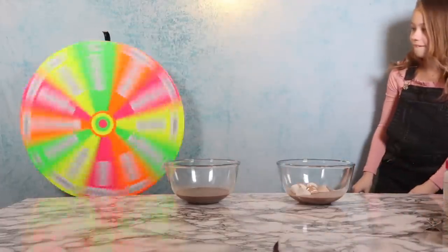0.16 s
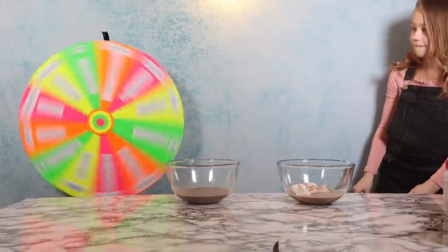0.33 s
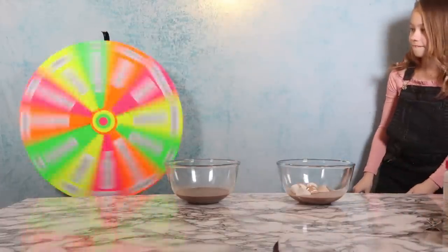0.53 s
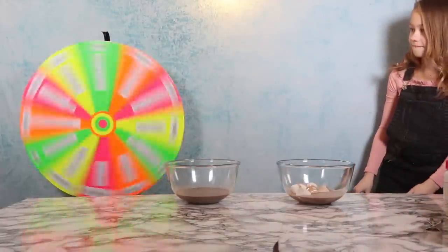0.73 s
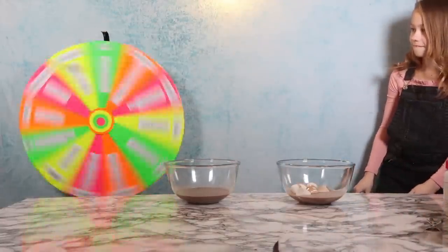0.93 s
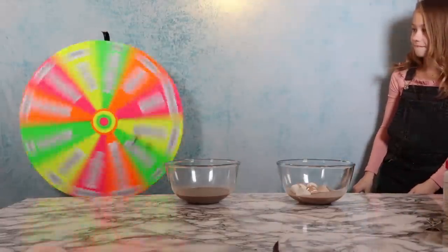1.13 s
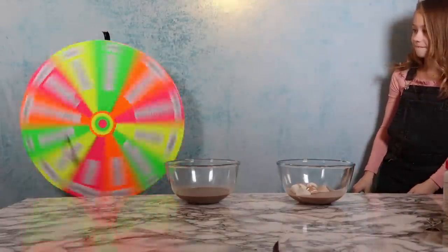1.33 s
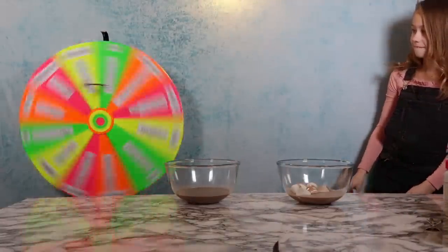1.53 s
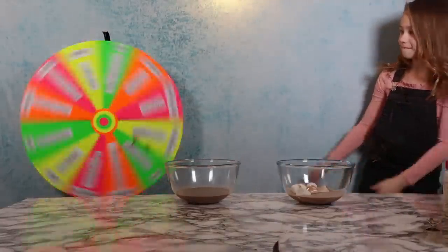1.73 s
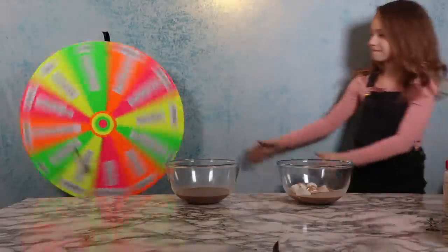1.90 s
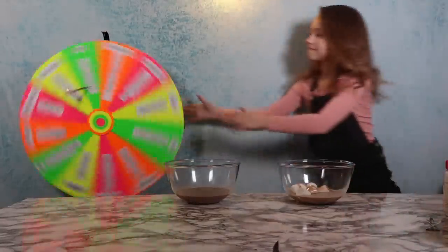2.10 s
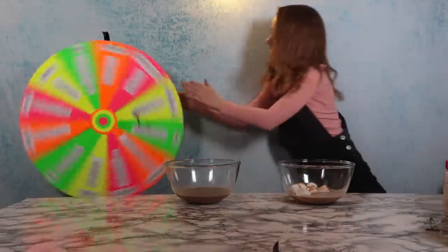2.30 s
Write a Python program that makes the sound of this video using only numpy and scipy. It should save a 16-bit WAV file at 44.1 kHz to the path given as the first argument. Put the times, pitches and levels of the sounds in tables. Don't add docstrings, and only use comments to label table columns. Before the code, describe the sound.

A dart smacks hard into a spinning wooden wheel, with hollow knocks before and after

```python
import sys
import numpy as np
from scipy import signal
from scipy.fft import rfft, irfft
from scipy.io import wavfile
from scipy.ndimage import uniform_filter1d

SR = 44100
rng = np.random.default_rng(int(sys.argv[2]) if len(sys.argv) > 2 else 0)


def gain_from_db(level_db):
    decades = np.asarray(level_db, float) / 20
    return 10 ** decades


def transcribe(u):
    v = np.clip(np.atleast_2d(u).T, -1, 1)
    q = np.round(v * 32767).astype(np.int16)
    wavfile.write(sys.argv[1], SR, q)


N = 108177
CLOCK_S = np.arange(N) / SR
T = np.arange(32768) / SR
SCUFF_S, SCUFF_LENGTH_S = 2.409, .06

# f/Hz, density/dB
HUM_COLOUR = [(25, -8), (54, -3.5), (133, -8), (403, -13), (916, -24), (3930, -33.5), (12500, -51.5),
              (15000, -65)]
# f/Hz, level/dB
HUM_SIDE = [(60, -27), (110, -25), (200, -8), (380, -8), (700, -8.5), (1290, -6.5), (2380, -6), (4400, 0),
            (8120, 2), (15000, 8.5)]
# t/s, level/dB
RUMBLE = [(0, 1.5), (.17, 0), (.27, -4), (.4, 1), (.6, -0.5), (.72, 2), (.85, -7), (1.05, -4), (1.27, -2.5),
          (1.36, -7), (1.56, -8), (1.64, -3), (1.75, -5), (1.9, -0.5), (2.0, -4), (2.2, 2), (2.45, 2)]
FIRM_STEPS_S = [.237, .270, .304, .387, .404, .437, .470, .532, .571, .654, .737, .820, .837, .871, .906,
                .922, .966, 1.004, 1.089, 1.548, 1.567, 1.615, 1.682, 1.732, 1.922, 1.949, 2.015, 2.082,
                2.369]
# t/s, peak/dB, f/Hz, t60/s
BOOMS = [(.078, -31, 89.4, 0.312), (0.099, -34.5, 50.7, 0.26), (0.323, -29, 73.1, 0.188),
         (0.454, -32, 94.6, 0.13), (0.676, -30, 68, 0.225), (0.921, -37.5, 55.8, 0.374),
         (1.61, -37, 120.2, 0.17), (1.823, -33.5, 85.3, 0.182), (2.059, -32.5, 99.4, 0.175),
         (2.08, -34, 47.1, 0.23), (2.186, -27, 24.2, 0.353), (2.425, -30, 100, 0.25)]
# start/s, length/s, level/dB, centre/Hz, relative width/1
RUSTLES = [(.859, .059, -47, 1750, .3), (.88, .12, -54, 2400, 1.2), (.915, .05, -47, 850, .9),
           (1.1, .024, -31, 2800, 1.3), (1.17, .13, -39, 500, 1.2), (1.578, .074, -48, 1100, 1.4),
           (1.615, .03, -43, 220, 1.2), (1.99, .06, -51, 2200, 1.2), (2.03, .07, -47.5, 1200, 1.6),
           (2.04, .023, -44, 400, 1.6), (2.11, .12, -49.5, 2400, 1.3), (2.187, .1, -39.5, 680, 2),
           (2.17, .19, -55, 4300, .9), (2.235, .025, -43, 1100, 1.5), (2.251, .039, -39, 283, 1.2),
           (2.255, .04, -49, 1300, 1.6), (SCUFF_S, SCUFF_LENGTH_S, -32.5, 1000, 1.4),
           (.452, .06, -41, 900, 1.8)]
# f/Hz, t60/s
ROOM_T60 = [(100, 0.913), (300, 0.19), (1000, 0.2994), (3000, 0.31), (7000, 0.37), (12000, 0.058)]
# f/Hz, level/dB
HIT_SIDE = [(60, -40.5), (200, -24.5), (500, -19), (1290, -18.5), (2380, -15.5), (4400, -9.5), (8120, -2),
            (15000, 3)]
# t/s, peak/dB, body/Hz, dull above/Hz, rattle/dB
KNOCKS = [
    (0.075, -17, 1445, 2950, -25),
    (0.3144, -23.5, 1100, 3330, -43.5),
    (0.4515, -24, 350, 2400, -21),
    (0.6605, -13.5, 330.9, 2343, -25.5),
    (0.865, -40, 1750, 2334, -45),
    (1.8203, -15.5, 323, 2920, -27.5),
    (2.4310, -16.5, 854, 2400, -30.5),
]
# f/Hz, width/Hz, level/dB
KNOCK_MODES = [
    [(279.5, 22.7, -5.5), (399.6, 25.2, 1.5), (604.5, 33.5, 1.5), (876.6, 135, -2.5), (1218.7, 25, -2.5),
     (1825, 36.6, -3.5), (2406, 68, -13)],
    [(760.3, 25, -5), (951, 28.5, -6), (1176, 59, -3), (1808, 67, -9.5), (2160, 22, -6.5),
     (2400, 46, -12.5), (3140, 46, -20.5)],
    [(264.3, 183, -0.5), (624, 39, -2), (897.6, 32, -5.5), (1210, 33, -7.5), (1940, 120, -15.5)],
    [(241.2, 34.8, -2.5), (613.6, 60.5, -4.5), (761.5, 22.6, -5), (899.6, 26, -2.5), (1068, 27.4, 1),
     (1189, 42, -5.5), (1812, 63, -11), (1976, 19.4, -15.5), (2400, 27, -16)],
    [(1588, 48, -0.5), (1876, 27, -1.5)],
    [(237.8, 17, -4.5), (403.7, 30, -2), (535, 54, -2.5), (904.4, 28.2, 1), (1058.6, 21, -3.5),
     (1273, 86, -10.5), (1652.6, 43, -12.5), (1976, 18.4, -14.5)],
    [(389, 108, 1), (763, 546, -1.5), (1672.7, 60, -7.5), (1957, 127, -9), (2460, 67, -18)],
]
# f/Hz, density/dB
KNOCK_COLOUR = [(100, -20.5), (220, 0.5), (300, 3), (1000, -2.5), (1800, -8), (3500, -13.5), (6000, -23)]
# f/Hz, density/dB
RATTLE_COLOUR = [(2500, -27), (4500, -7), (6500, -5), (9500, -6.5), (11000, -14.5), (14000, -28.5)]
# f/Hz, width/Hz, level/dB
BARK_MODES = [(925.6, 160, -8.5), (1134.6, 160, 4), (1534.5, 140, -12), (2003.6, 170, -6),
              (2656.4, 120, -7.5), (3950, 300, -8), (5240, 230, -16.5), (8644, 300, -26.5)]
# f/Hz, level/dB, t60/s
RING_MODES = [(287, -8, .4), (915, -10, .18), (1225, -4, .18), (1505, -7, .28), (1651, -6, .28),
              (1750, -8, .25), (2001, -4, .3), (2105, -6, .15), (2273, -7, .22), (2370, -9.5, .25),
              (2675.4, -8, .22), (2851, -13, 0.18), (3114.4, -16, .16), (650, -14, .2)]
# f/Hz, level/dB, t60/s
BEATING_PAIR = [(1033, -1, .24), (1075, -2, .24)]
# f/Hz, density/dB
DART_COLOUR = [(150, -25.5), (290, -9), (760, -18.5), (1200, -0.5), (2700, -6), (3500, -28), (6500, -28.5),
               (10000, -50)]
# f/Hz, density/dB
CRACK_COLOUR = [(1500, -19.5), (3400, -0.5), (4000, 15), (9000, -1), (15000, -14)]

HUM_DB, WHINE_HZ, WHINE_DB = -46, 13006, -85.5
STEP_HZ, STEP_FROM_S, STEP_TO_S = 59.94, .237, 2.1
STEP_DB, FIRM_DB, STEP_MID_DB = -56.5, -45, -12
STEP_RING_HZ, STEP_T60_S, STEP_RISE_S = 4220, 0.011, 0.000545
BOOM_WAVER_DB, BOOM_RISE_S = 2, 0.0086
SWISH_GRAIN_DB, SWISH_Q = 1, 0.56
ECHOES_PER_S, FIRST_ECHO_S, FILL_S = 2300, .002, .006
SMALL_BELOW_HZ, WIDEST_HZ = 210, 60
KNOCK_GAIN_DB, KNOCK_WET_DB, CLICK_DB, KNOCK_Q = 16.5, 1, -12, 2.2
PLANK_RING, THUD_DB, THUD_T60_S = 3.8, -3, .04
RATTLE_LATE_S, BARK_RISE_S = 0.0048, 0.00077
DART_S, DART_DB, DART_WET_DB = 1.1098, 3.5, 12.5
CRACK_DB, CRACK_S, RING_DB, RING_MAX_S = -6, .0008, -18, .3
DUCK_DB, DUCK_S, HOLD_S, BACK_S = -7, 0.1, 0.55, 0.33
TOP_HZ = 14200


def read(table, hz):
    table = np.array(table, float)
    log_hz = np.log(np.maximum(table[:, 0], 1))
    return np.interp(np.log(np.maximum(hz, 1)), log_hz, table[:, 1])


def colour(x, table):
    size = 4096
    hz = np.arange(size // 2 + 1) * SR / size
    cepstrum = irfft(read(table, hz) * np.log(10) / 20)
    cepstrum[1:size // 2] *= 2
    cepstrum[size // 2 + 1:] = 0
    return signal.fftconvolve(x, irfft(np.exp(rfft(cepstrum))))[:len(x)]


def unit(x, db=0.):
    return x * gain_from_db(db) / np.sqrt(np.sum(x ** 2))


def ring(modes, t):
    return sum(gain_from_db(db) * np.sin(2 * np.pi * hz * t) * gain_from_db(-60 * t / max(t60, .002))
               for hz, db, t60 in modes)


def band(x, hz, q):
    edges = [hz / (1 + .5 / q), min(hz * (1 + .5 / q), .45 * SR)]
    return signal.sosfilt(signal.butter(1, edges, "band", fs=SR, output="sos"), x)


def walk(rate_hz):
    k = int(SR / rate_hz)
    steps = np.repeat(rng.standard_normal(N // 64 + 1), k)[:N]
    return 1.3 * uniform_filter1d(uniform_filter1d(steps, k), k)


def octave_weights(hz, lowest_hz, count):
    octave = np.log2(np.maximum(hz, lowest_hz) / lowest_hz)
    return [np.clip(1 - abs(octave - k), 0, 1) for k in range(count)]


def room():
    late = np.maximum(T - FIRST_ECHO_S, 0)
    share = np.clip(ECHOES_PER_S / SR * (1 + (late / FILL_S) ** 2), 0, 1)
    present = (rng.random(len(T)) < share) * (late > 0)
    spectrum = rfft(rng.standard_normal(len(T)) * present / np.sqrt(share))
    weights = octave_weights(np.arange(len(T) // 2 + 1) * SR / len(T), 60, 9)
    return unit(sum(irfft(spectrum * weight) * gain_from_db(-60 * late / read(ROOM_T60, 60 * 2 ** k))
                    for k, weight in enumerate(weights)))


def place(out, s, direct, feed):
    direct = signal.sosfilt(signal.butter(2, SMALL_BELOW_HZ, "high", fs=SR, output="sos"), direct)
    mid, other = (direct + signal.fftconvolve(feed, room())[:len(T)] for _ in range(2))
    i = int(s * SR)
    pair = np.array([mid, colour(other, HIT_SIDE)])[:, :N - i]
    return out + np.pad(pair, ((0, 0), (i, N - i - pair.shape[1])))


def hum():
    mid, side = (colour(rng.standard_normal(N), HUM_COLOUR) for _ in range(2))
    spectrum = rfft(np.array([mid, colour(side, HUM_SIDE)]))
    swell_db = np.interp(CLOCK_S, *np.array(RUMBLE).T)
    out = 0
    for k, weight in enumerate(octave_weights(np.arange(spectrum.shape[1]) * SR / N, 30, 10)):
        level_db = 2.64 * walk(6.53) + 0.91 * walk(25) + (k < 5) * swell_db
        out = out + irfft(spectrum * weight, N) * gain_from_db(level_db)
    whine = gain_from_db(WHINE_DB + walk(20)) * np.sqrt(2) * np.sin(2 * np.pi * WHINE_HZ * CLOCK_S)
    return out * gain_from_db(HUM_DB) / mid.std() + whine * np.array([[1], [.4]])


def lens():
    grid = np.arange(STEP_FROM_S, STEP_TO_S, 1 / STEP_HZ)
    times = np.r_[grid, FIRM_STEPS_S] - .001
    db = np.r_[np.full(len(grid), STEP_DB), np.full(len(FIRM_STEPS_S), FIRM_DB)]
    db = db + 2.5 * rng.standard_normal(len(times))
    train = np.bincount((times * SR).astype(int), gain_from_db(db), N)
    tick = ring([(STEP_RING_HZ, 0, STEP_T60_S), (STEP_RING_HZ * 1.2, -5, STEP_T60_S)], T)
    tick = tick * (1 - np.exp(-T / STEP_RISE_S))
    return signal.fftconvolve(train, tick)[:N] * np.array([[gain_from_db(STEP_MID_DB)], [1]])


def booms():
    out = 0
    for s, db, hz, t60 in BOOMS:
        t = np.maximum(CLOCK_S - s, 0)
        note = ring([(hz, db + BOOM_WAVER_DB * walk(25), t60)], t)
        out = out + note * (1 - np.exp(-t / BOOM_RISE_S))
    return out * np.array([[1], [.015]])


def swishes():
    out = 0
    for s, length, db, hz, width in RUSTLES:
        u = np.clip((CLOCK_S - s) / length, 0, 3)
        swell = 2.216 * u / 0.398 * np.exp(-u / 0.3393) * (u < 3)
        grain_db = SWISH_GRAIN_DB * walk(150) + 1.5 * walk(60)
        rub = band(band(rng.standard_normal((2, N)), hz, 1 / width), hz, SWISH_Q / width)
        out = out + swell * gain_from_db(db + grain_db) * rub / rub.std()
    return np.array([out[0], colour(out[1], HUM_SIDE)])


def blunt_tap(body_hz, top_hz):
    tap = colour(-1. * (T == 0), KNOCK_COLOUR)
    tap = tap + band(tap, body_hz, KNOCK_Q)
    return unit(signal.sosfilt(signal.butter(3, top_hz, fs=SR, output="sos"), tap))


def plank(modes):
    out = 0
    for k, (hz, width, db) in enumerate(modes):
        width = min(width, WIDEST_HZ)
        note = ring([(hz, db + 2.5 * walk(70)[:len(T)], PLANK_RING / width)], T)
        out = out + (-1) ** k * width * note
    return unit(out * (1 - np.exp(-T / BARK_RISE_S)))


def knocks(out):
    for (s, db, body_hz, top_hz, rattle_db), modes in zip(KNOCKS, KNOCK_MODES):
        tap = blunt_tap(body_hz, top_hz)
        thud = unit(ring([(body_hz, 0, THUD_T60_S)], T), THUD_DB)
        rattle = colour(rng.standard_normal(len(T)) * T * np.exp(-T / RATTLE_LATE_S), RATTLE_COLOUR)
        gain = gain_from_db(db + KNOCK_GAIN_DB)
        direct = plank(modes) + gain_from_db(CLICK_DB) * tap - thud
        feed = gain_from_db(KNOCK_WET_DB) * (tap + unit(rattle, rattle_db))
        out = place(out, s, gain * direct, gain * feed)
    return out


def dart(out):
    rise = 1 - np.exp(-T / BARK_RISE_S)
    bark = ring([(hz, db, 2.43 / width) for hz, width, db in BARK_MODES], T) * rise
    crack = colour(rng.standard_normal(len(T)) * rise * np.exp(-T / CRACK_S), CRACK_COLOUR)
    flutter = [(hz, db + 4 * walk(60)[:len(T)], min(t60, RING_MAX_S)) for hz, db, t60 in RING_MODES]
    board = ring([*flutter, *BEATING_PAIR], T)
    direct = bark + gain_from_db(CRACK_DB) * crack + gain_from_db(RING_DB) * board
    feed = unit(colour(1. * (T == 0), DART_COLOUR), DART_WET_DB)
    return place(out, DART_S, gain_from_db(DART_DB) * direct, gain_from_db(DART_DB) * feed)


def scene():
    background = hum() + lens() + booms() + swishes()
    mid, side = dart(knocks(background))
    return np.array([mid + side, mid - side])


def band_limit(x):
    return signal.sosfilt(signal.butter(12, 16190, fs=SR, output="sos"), x)


def record(dry):
    after = np.maximum(CLOCK_S - DART_S, 0)
    drop = 1 - np.exp(-after / DUCK_S)
    recovery = np.clip(1 - (after - HOLD_S) / BACK_S, 0, 1)
    heard = signal.sosfilt(signal.ellip(6, .3, 32, TOP_HZ, fs=SR, output="sos"), dry)
    mix = np.clip(heard * gain_from_db(DUCK_DB * drop * recovery), -1, 1)
    return band_limit(mix)


dry = scene()
out = record(dry)
transcribe(out)
```